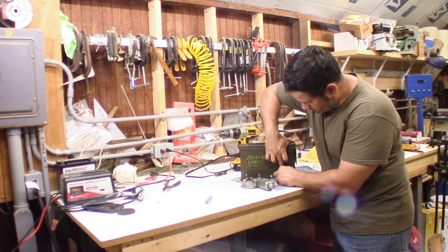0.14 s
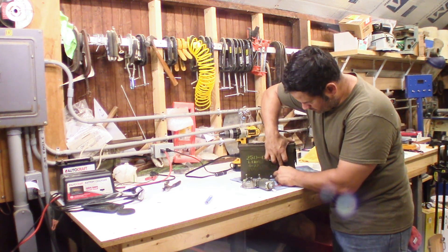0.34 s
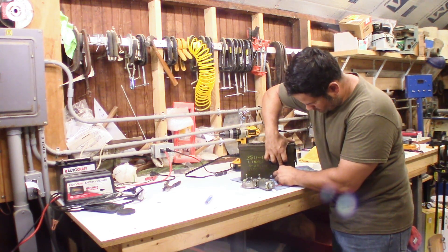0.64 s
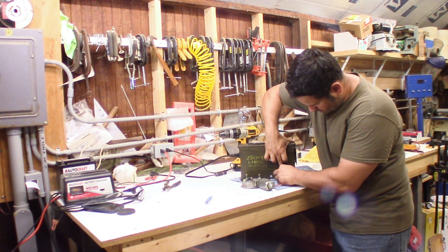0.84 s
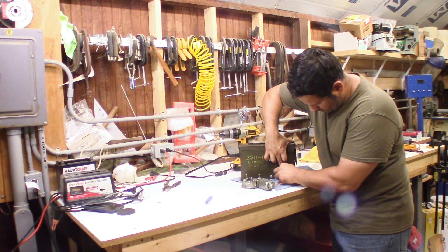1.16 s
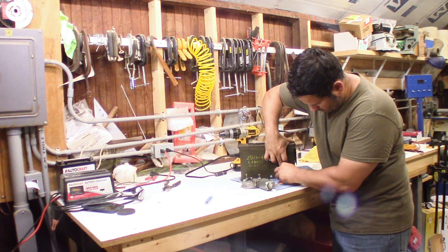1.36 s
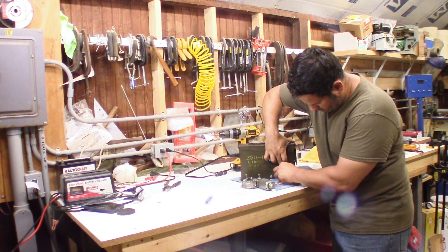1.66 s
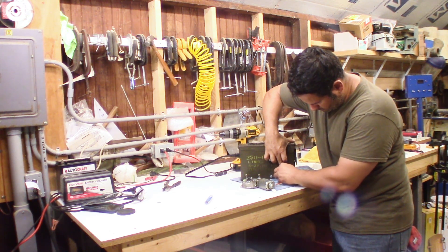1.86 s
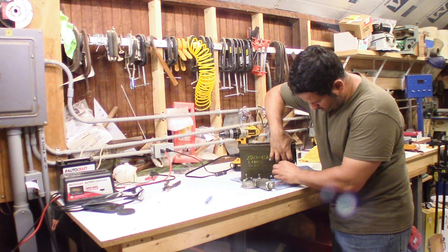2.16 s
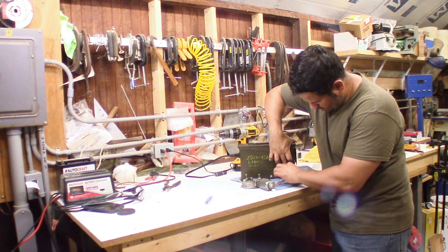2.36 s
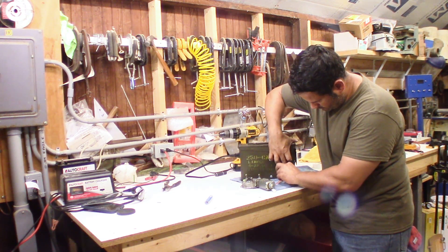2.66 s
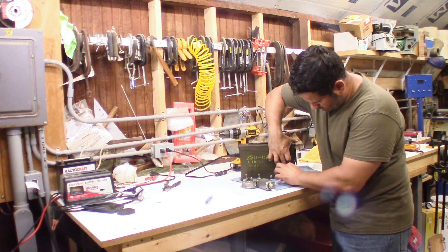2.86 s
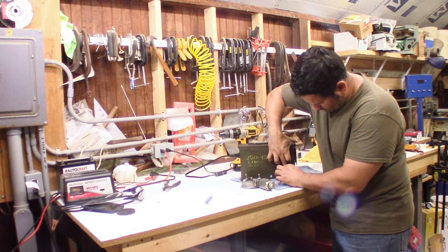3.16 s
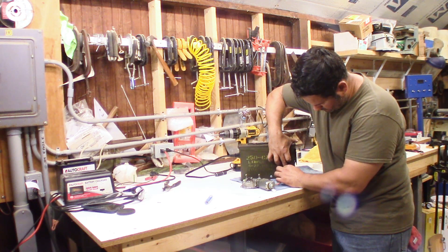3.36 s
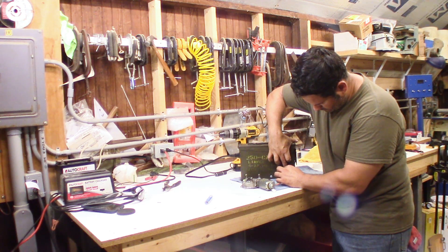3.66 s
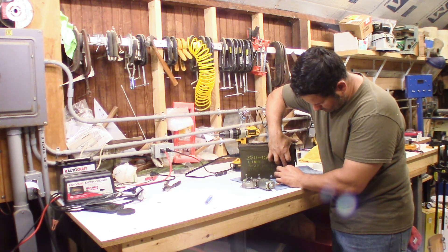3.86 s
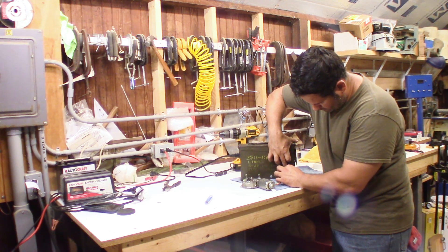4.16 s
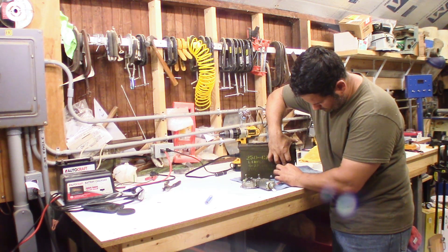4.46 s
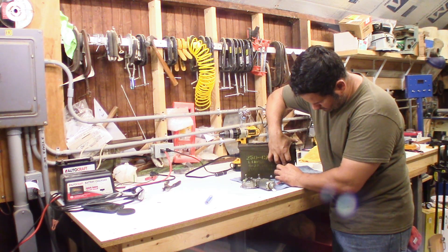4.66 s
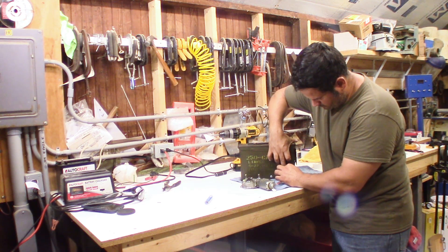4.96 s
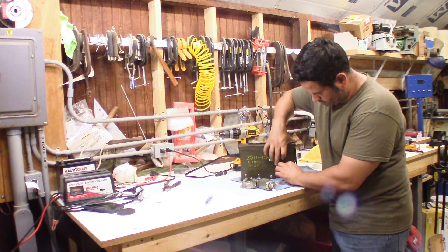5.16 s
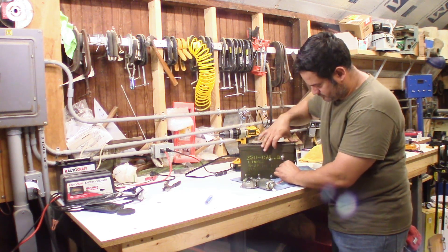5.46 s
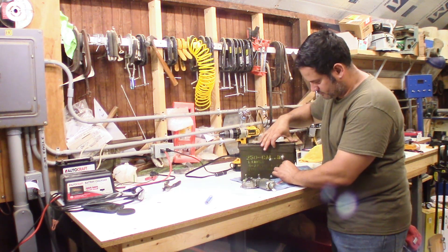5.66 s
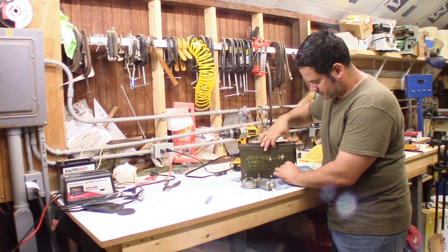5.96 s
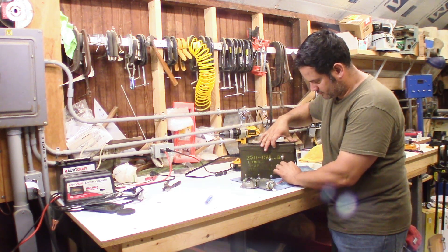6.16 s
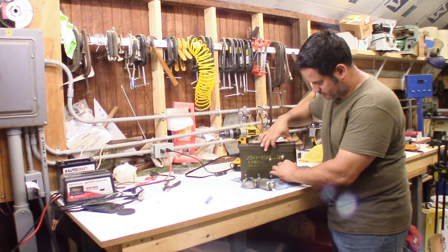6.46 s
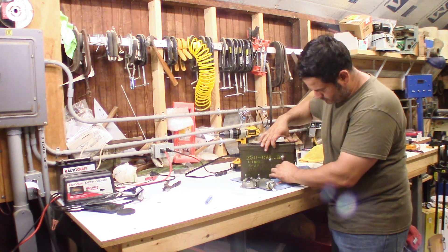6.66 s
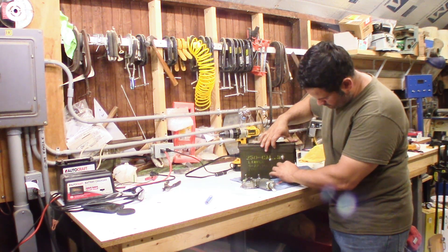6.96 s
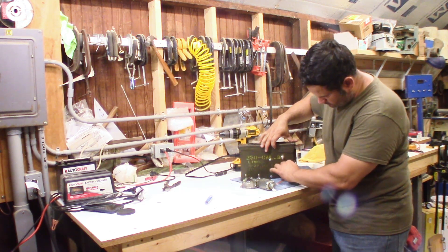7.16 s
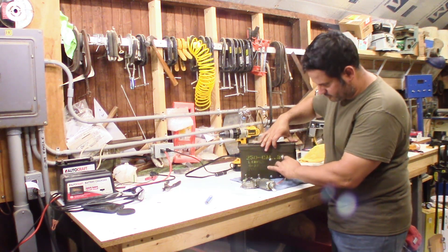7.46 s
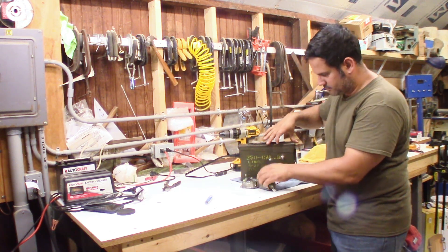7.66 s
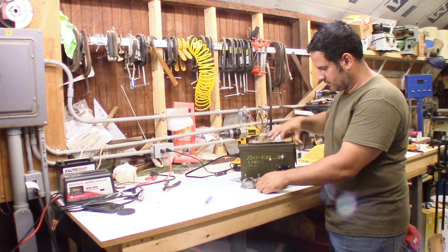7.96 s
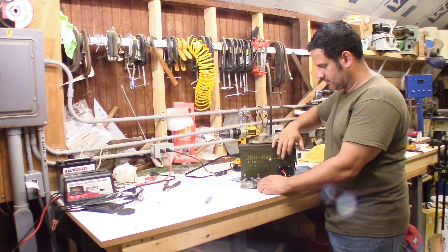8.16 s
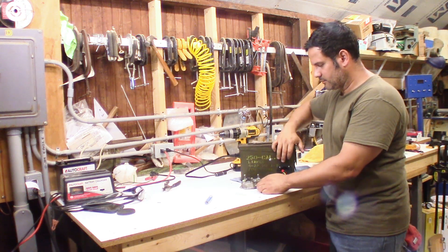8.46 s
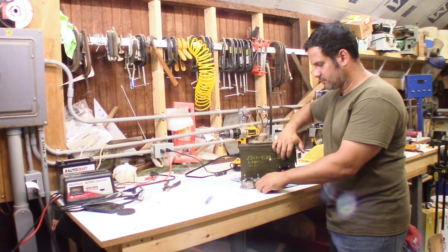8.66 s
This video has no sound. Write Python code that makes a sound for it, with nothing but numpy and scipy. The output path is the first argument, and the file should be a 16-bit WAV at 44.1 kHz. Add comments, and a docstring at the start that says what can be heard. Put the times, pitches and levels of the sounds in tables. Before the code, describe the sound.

A near-mono microphone in a cluttered wooden shed picks up hands working on a hollow sheet-metal box. At 0 s a solid knock booms the bench, followed until 0.45 s by quick small taps, scrapes and rattles. Soft metallic ticks come around 1 to 1.4 s, with a low bump near 1.45, and more taps and tiny scrapes between 1.6 and 2.1. A firmer tap lands at 3 s; faint contacts continue sparsely to 5.3. At 5.5 s a sharp bright clank rings from the lid and clip. Light taps and brushing contacts follow from 6 to 7.5, then a low bench thump at 7.8. At 8.4 a small hollow case is set down, and at 8.7 comes the loudest, bright dense metal clatter with a low thud. Each contact has a brief room tail. Underneath lie swelling low rumble, faint hum, hiss and quiet high cricket trills.

```python
"""Hands unhook and clip wire leads on a sheet-metal box on a wooden bench: contacts set off dying sines in
every part. A small hollow case is set down; a cluttered shed answers each contact briefly with dying noise.
Shifting weight booms the bench top as low dying sines, and the hum once swells and dies; crickets outside are
narrow noise bands and sliding trills. Under it lie a low swelling rumble, a hum and the hiss of a mono
microphone, all shaped from noise."""
import sys
import numpy as np
from scipy import signal
from scipy.fft import rfft, irfft, next_fast_len
from scipy.io import wavfile
from scipy.ndimage import uniform_filter1d

SR = 44100
rng = np.random.default_rng(int(sys.argv[2]) if len(sys.argv) > 2 else 0)


def unload_wav(signal):
    """Save mono or channel-first audio to the path in sys.argv[1] as 16-bit WAV at rate SR, clipped to [-1, 1]."""
    wavfile.write(
        sys.argv[1],
        SR,
        np.round(np.clip(np.atleast_2d(signal).T, -1, 1) * 32767).astype(np.int16),
    )


N = 388785  # length [samples]

# Source levels are those ahead of the gain and soft overload in record().


def gain_of(db):
    """Decibels to amplitude."""
    return 10 ** (np.asarray(db) / 20)


def evened(x):
    """Scales a sound to rms 1."""
    return x / np.sqrt(np.mean(x ** 2) + 1e-20)


def read(points, hz):
    """Reads a curve of (frequency, value) points on a log-frequency axis."""
    f, value = np.transpose(points)
    return np.interp(np.log(hz + 1), np.log(f + 1), value)


def add(mix, start_s, sound):
    """Mixes a sound in at its start time, cut at the end of the mix."""
    part = mix[max(round(start_s * SR), 0):][:len(sound)]
    part += sound[:len(part)]


def hands():
    """Blows start at full force and rattle out; clatters swell, then die; the case is set down once."""
    # sharp blows: (time [s], level [dB] of bench, box walls, box lid, terminal post, clip jaw, clip spring);
    # each level is the rms of the direct ring over its first 20 ms
    blows = [(0.001, -27.5, -28, -35.5, -46, -51, -48), (0.119, -51, -41.5, -49, -70, -55.5, -62),
             (0.208, -50, -32, -41, -54, -57, -74), (0.273, -55, -46, -50, -55, -54.5, -67),
             (0.43, -54.5, -50, -43, -65, -52.5, -57), (0.972, -71, -50, -55, -72, -60, -70),
             (1.119, -58, -47.5, -46.5, -64, -57, -66), (1.31, -64, -44, -54, -62, -57.5, -72),
             (1.354, -53, -38.5, -39.5, -59, -56.5, -60), (1.825, -55, -54, -52, -66, -56, -72),
             (1.904, -50, -33.5, -42, -64, -52.5, -72), (1.966, -60, -68, -71, -73, -56, -67),
             (1.992, -67, -43.5, -47.5, -72, -63, -69), (2.769, -53.5, -60, -65, -75, -56, -67),
             (2.91, -60.5, -57, -59, -54, -50.5, -60), (2.991, -40, -37, -37.5, -54, -45, -59),
             (3.613, -57, -57, -51.5, -63, -58, -73), (4.173, -58, -51, -58, -74, -68, -75),
             (4.814, -75, -64, -60, -58.5, -62, -72), (5.341, -58, -50, -46.5, -74, -68, -76),
             (5.5, -55, -28.5, -18, -26.5, -27.5, -36), (5.991, -59, -50, -48, -62, -60.5, -75),
             (6.492, -54, -40, -45.5, -53.5, -50.5, -72), (7.071, -65, -58, -68, -76, -62, -74),
             (7.14, -47, -37, -51.5, -64, -54, -70), (7.462, -55.5, -39.5, -49, -54.5, -51.5, -71),
             (8.675, -46, -44, -43.5, -63, -59, -57.5)]
    # scrapes and clatters of many small contacts: (time [s], the same six levels [dB], build-up [s])
    clatters = [(0.166, -46, -35.5, -54, -72, -61, -59, 0.0078),
                (0.189, -38.5, -40, -48, -51.5, -47, -56, 0.0052),
                (0.224, -51, -57, -56, -59, -59, -71, 0.0038),
                (0.444, -57, -55, -50, -63, -56, -58, 0.0066),
                (1.586, -62, -45, -49, -71, -68, -69, 0.0025),
                (1.614, -61, -47.5, -47.5, -60, -62, -72, 0.003),
                (2.088, -58, -52, -58, -64, -67, -71, 0.0034),
                (2.814, -55, -50.5, -58, -72, -65, -65, 0.0037),
                (4.386, -56, -51, -53, -66, -64, -73, 0.013), (4.428, -49, -52, -53, -63, -68, -71, 0.013),
                (4.488, -53, -46.5, -62, -73, -70, -75, 0.0027),
                (5.058, -60, -47.5, -49.5, -61, -53, -66, .0031),
                (6.014, -51, -45, -58, -67, -59, -72, 0.0094),
                (6.067, -51, -46.5, -48.5, -68, -72, -77, 0.0024),
                (6.39, -52, -52, -63, -80, -80, -77, .006), (6.926, -71, -66, -74, -72, -62, -70, 0.0089),
                (7.123, -46, -41, -59, -64, -49.5, -69, 0.0093),
                (7.249, -51.5, -58, -59, -58, -60, -69, 0.0099),
                (7.903, -54, -53, -53, -61, -61, -65, .0047),
                (8.695, -29.5, -12.5, -18, -13.5, -14.5, -14.5, 0.0032)]
    # the case meets the bench: (time [s], level [dB] over the first 20 ms, build-up [s])
    set_down = (8.418, -21.5, 0.0032)
    # modes of the small hollow case: (frequency [Hz], relative level [dB], t60 before the freedom factor [s])
    case_modes = [(303, -4.5, 0.028), (413, -12, 0.046), (510, 2, .04), (700, -10, 0.057),
                  (810, -5.5, 0.053), (1030, -12, 0.035), (1410, -26, .04), (1750, -31, .03)]
    # freedom to ring, a factor on t60: lower under a damping hand
    blow_freedom, clatter_freedom, case_freedom = 1.22, 0.93, 0.96
    out = np.zeros(N)
    for start_s, *levels_db in blows:
        add(out, start_s, touch(levels_db, rattling(), 0.01, blow_freedom))
    for start_s, *levels_db, build_s in clatters:
        contact = swelling(build_s)
        add(out, start_s, touch(levels_db, contact, 0.0099 + build_s, clatter_freedom))
    start_s, db, build_s = set_down
    case = ring(case_modes, swelling(build_s), 0.019, case_freedom)
    add(out, start_s, gain_of(db) * case)
    return out


def rebounds(per_s):
    """Time axis and a random train of small contacts of random force."""
    t = np.arange(14400) / SR
    hits = rng.random(len(t)) < per_s / SR
    return t, rng.standard_normal(len(t)) * hits


def rattling():
    """One full blow, then rebounds that lose force exponentially."""
    rattle_s = 0.0041  # time constant
    t, train = rebounds(1600)
    return 0.66 * train * np.exp(-t / rattle_s) + (t == 0)


def swelling(build_s):
    """Dense contacts that swell to a peak after build_s, then die."""
    t, train = rebounds(4000)
    u = t / build_s
    return train * u * np.exp(-u)


def touch(levels_db, contact, rise_s, freedom):
    """One contact pattern excites every part of bench, box and clip at its own level."""
    # modes of each part: (frequency [Hz], relative level [dB], t60 before the freedom factor [s])
    bench_modes = [(173.3, 1.5, 0.11), (214, -13, 0.25), (249.4, 7, 0.084)]
    wall_modes = [(357.7, 2.5, 0.15), (445, -18, 0.015), (468, 6.5, 0.042), (538, -4.5, 0.087)]
    lid_modes = [(715, 14, 0.052), (726, 3.9, 0.16), (800, 12.1, 0.19), (922, 11.7, 0.16)]
    rim_modes = [(985, -1.5, 0.075), (1114, 1, 0.04), (1228, 0, 0.056), (1336, -4, 0.036),
                 (1576, -1.5, 0.017)]
    post_modes = [(1604, -4, 0.17), (1920, 16.5, 0.015), (2083, 7.5, 0.067), (2313, 17, 0.012)]
    jaw_modes = [(2570, -37, 0.015), (2760, -6.5, 0.026), (2945, -3.5, 0.038), (3220, -3, 0.048),
                 (3510, -8, 0.043), (3710, -10, 0.034)]
    spring_modes = [(4100, 5, 0.007), (4370, 7.5, 0.012), (4730, -1, 0.0091), (5640, 0, 0.014)]
    tick_modes = [(6270, -3, 0.024), (7030, 6, 0.0028), (8350, 12.5, 0.0031), (10500, -11.5, .006),
                  (12400, -4, 0.0064), (14400, -7, 0.0043)]
    bench, walls, lid, post, jaw, spring = levels_db
    rim = lid + 0.4 * (post - lid) + 1  # part of the way from lid to post in dB, then 1 dB up
    tick = spring - 6  # bright tick against the spring, dB
    parts = [(lid, lid_modes), (rim, rim_modes), (bench, bench_modes), (walls, wall_modes),
             (post, post_modes), (jaw, jaw_modes), (spring, spring_modes), (tick, tick_modes)]
    return sum(gain_of(db) * ring(modes, contact, rise_s, freedom) for db, modes in parts)


def ring(modes, contact, rise_s, freedom, spread_db=2.0):
    """One part: dying sines set off by the contact, then the shed's countless reflections as dying noise."""
    # how long the shed answers: (frequency [Hz], t60 [s])
    shed_decay = [(200, 0.32), (700, 0.24), (2000, 0.28), (5000, 0.25), (11000, 0.23)]
    shed_db = -0.5  # reflections against the direct ring, before their rise and decay
    hz, db, t60 = np.transpose(modes)[:, :, None]
    t = np.arange(len(contact)) / SR

    struck_db = db + spread_db * rng.standard_normal(hz.shape)  # each struck spot favours other modes
    decay = gain_of(struck_db - 60 * t / (t60 * freedom))
    sines = decay * np.sin(2 * np.pi * (hz * t + rng.random(hz.shape)))
    direct = signal.fftconvolve(contact, sines.sum(0))[:len(t)]
    edges_hz = [0.62 * hz.min(), min(1.023 * hz.max(), 18000)]
    band = signal.butter(2, edges_hz, "band", fs=SR, output="sos")
    direct = signal.sosfilt(band, direct)  # a part radiates little outside its own range

    f = np.fft.rfftfreq(len(t), 1 / SR)
    mode_power = gain_of(2 * db) / (1 + ((f - hz) / (0.15 * hz)) ** 4)
    blur = np.sqrt(mode_power.sum(0))  # modes merge in the reflections
    echoes = evened(irfft(rfft(rng.standard_normal(len(t))) * blur, len(t)))
    echoes *= gain_of(shed_db - 60 * t / read(shed_decay, hz.mean()))
    echoes *= np.minimum(t / rise_s, 1)
    return direct / np.std(direct[:SR // 50]) + echoes


def thumps():
    """Low dying sines with a soft onset: shifting weight booms the bench top, and at 7.8 s the hum swells once
    and slowly dies."""
    # (time [s], level before the soft onset [dB], frequency [Hz], t60 [s])
    low_booms = [(0.001, -18.5, 81.3, 0.33), (0.201, -23, 75.4, 0.27), (1.449, -23, 67, 0.096),
                 (7.757, -25, 76.5, 0.25), (7.8, -35.5, 62.14, 2.1), (8.426, -24, 177.5, 0.29),
                 (8.701, -17, 74.4, 0.43)]
    out = np.zeros(N)
    t = np.arange(SR // 2) / SR
    onset = 1 - np.exp(-t / 0.0068)
    for start_s, db, hz, t60 in low_booms:
        add(out, start_s, gain_of(db - 60 * t / t60) * onset * np.sin(2 * np.pi * hz * t))
    return out


def resonate(x, hz, width):
    """Narrow noise: shifts the curve hz down to zero, smooths twice and shifts back."""
    turn = np.exp(2j * np.pi * np.cumsum(hz * np.ones(len(x))) / SR)
    r = np.exp(-np.pi * width / SR)
    smooth = signal.lfilter([1], np.convolve([1, -r], [1, -r]), x / turn)
    return evened((turn * smooth).real)


def narrow_noise(hz, width):
    """Fresh noise narrowed around a pitch, at rms 1."""
    return resonate(rng.standard_normal(N), hz, width)


def crickets():
    """Fast wing strokes blur into narrow wandering trills over the wider far chorus."""
    # far singers: (frequency [Hz], level [dB], width of each smoothing [Hz])
    far_chorus = [(4710, -69.5, 300), (5530, -71.5, 410)]
    return near_song() + sum(gain_of(db) * narrow_noise(hz, width) for hz, db, width in far_chorus) + high_trills()


def near_song():
    """The nearest singers trill in turns: one noise band whose level and pitch wander."""
    first_top_s, every_s = 0.35, 0.665
    top_db, depth_db = -62, 8.5
    pitch_hz, drift_hz = 4674, 60
    turn = (np.arange(N) / SR - first_top_s) / every_s
    hz = pitch_hz + drift_hz * np.interp(turn, np.arange(-1, 15), rng.standard_normal(16))
    level_db = top_db - depth_db * np.sin(np.pi * turn) ** 2
    return gain_of(level_db) * narrow_noise(hz, 210)


def high_trills():
    """One higher singer: each trill slides up to its pitch and holds, pulsed by the wing strokes."""
    # (time [s], level before the end fades [dB])
    trill_starts = [(1.06, -64.5), (3.115, -64), (5.377, -62), (7.36, -65.5)]
    trill_s, pitch_hz = 0.335, 4940
    slide_hz, slide_s = 100, 0.07  # starts this far below; time constant
    strokes_per_s, stroke_depth = 45, 0.6
    out = np.zeros(N)
    t = np.arange(0, trill_s, 1 / SR)
    strokes = 1 + stroke_depth * np.sin(2 * np.pi * strokes_per_s * t)
    for start_s, db in trill_starts:
        waver_hz = 400 * uniform_filter1d(rng.standard_normal(len(t)), size=400)
        turns = np.cumsum(pitch_hz - slide_hz * np.exp(-t / slide_s) + waver_hz) / SR
        trill = evened(np.sin(2 * np.pi * turns) * strokes)
        add(out, start_s, gain_of(db) * trill * signal.windows.tukey(len(t), .15))
    return out


def coloured(points):
    """Steady noise of the given spectrum at rms 1."""
    size = next_fast_len(N)
    hz = np.fft.rfftfreq(size, 1 / SR)
    spectrum = rfft(rng.standard_normal(size)) * gain_of(read(points, hz))
    return evened(irfft(spectrum, size)[:N])


def background():
    """Room air and hiss, a swelling rumble and a slightly blurred hum."""
    # spectrum of air and hiss: (frequency [Hz], relative level [dB per Hz])
    air_spectrum = [(11, -31), (18, 0.5), (40, -4.5), (86, -10), (124, -9.5), (155, -17), (316, -23),
                    (470, -23.5), (698, -30), (1070, -28), (1270, -35.5), (4170, -41.5), (4800, -36.5),
                    (6200, -44), (15800, -48)]
    # the rumble swells now and then: (time of centre [s], level added at the top [dB])
    rumble_swells = [(.45, -38.5), (1.03, -43), (1.55, -35.5), (2.3, -45), (3.16, -42), (3.7, -43),
                     (5.6, -45), (6.55, -43), (8.259, -37), (8.8, -33)]
    # (frequency [Hz], level [dB], width of each smoothing [Hz])
    hum_tones = [(58.9, -50, 6.2), (128.2, -55.5, 14)]
    air_db, rumble_db, swell_s = -43, -51, 0.14
    t = np.arange(N) / SR
    swell = gain_of(rumble_db)
    for centre_s, db in rumble_swells:
        swell = swell + gain_of(db) * np.exp(-((t - centre_s) / swell_s) ** 2)
    rumble = swell * narrow_noise(31.1, 12.7)
    hum = sum(gain_of(db) * narrow_noise(hz, width) for hz, db, width in hum_tones)
    return gain_of(air_db) * coloured(air_spectrum) + rumble + hum


def scene():
    """Everything reaches one microphone, alike in both channels."""
    mono = hands() + thumps() + crickets() + background()
    return np.array([mono, mono])


def record(dry):
    """Soft overload, a trace of hiss opposite in the two channels, then the band limit."""
    # spectrum of the side hiss: (frequency [Hz], relative level [dB per Hz])
    side_spectrum = [(59, -34), (100, -16), (321, -12.5), (3160, -16.5), (4930, -18.5), (6920, -15),
                     (15800, -19)]
    side_db, edge_hz = -67.5, 15750
    side = gain_of(side_db) * coloured(side_spectrum)
    wet = 0.99 * np.tanh(dry / 1.453) + np.array([side, -side])
    low_pass = signal.firwin(511, edge_hz, window=("kaiser", 9), fs=SR)
    return signal.oaconvolve(wet, low_pass[None], "same")


dry = scene()
out = record(dry)
unload_wav(out)
```